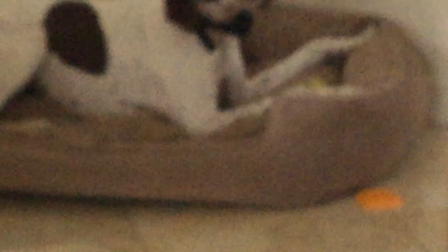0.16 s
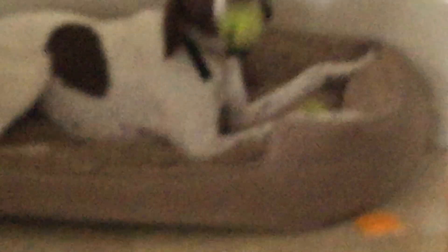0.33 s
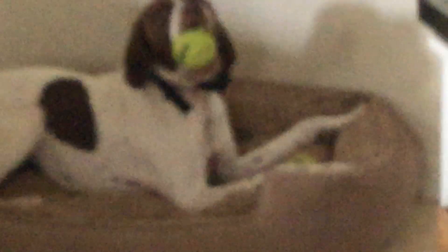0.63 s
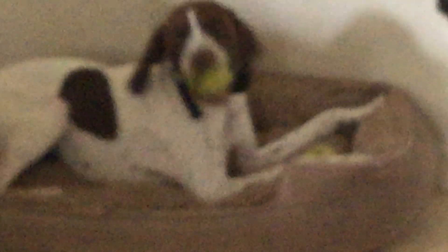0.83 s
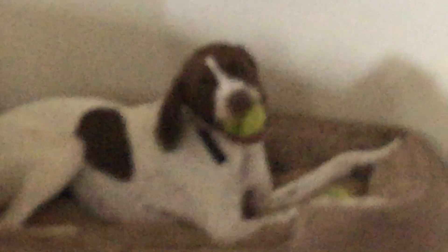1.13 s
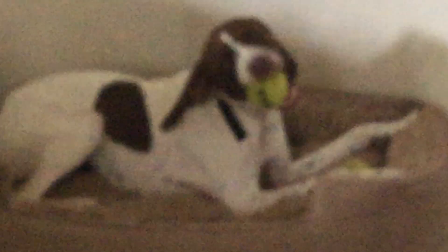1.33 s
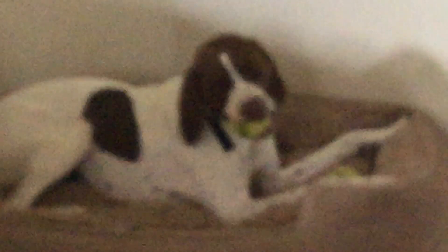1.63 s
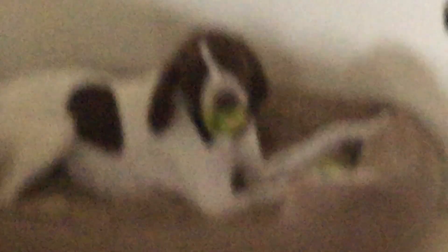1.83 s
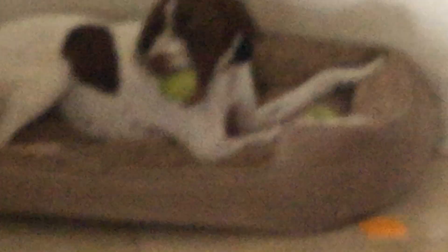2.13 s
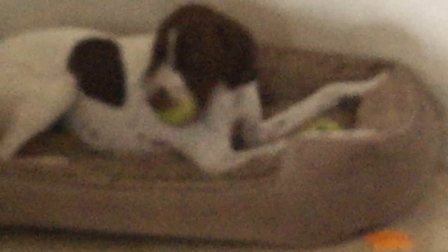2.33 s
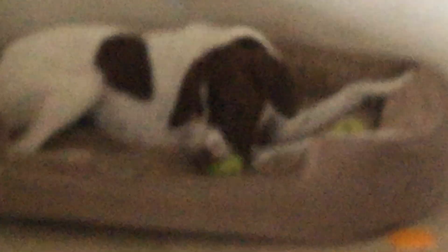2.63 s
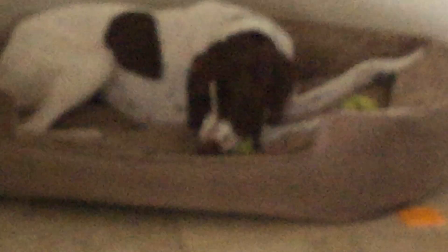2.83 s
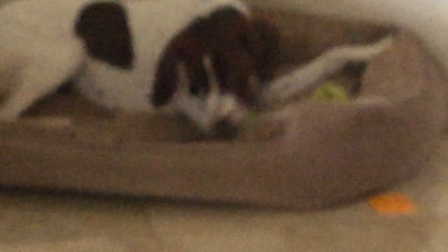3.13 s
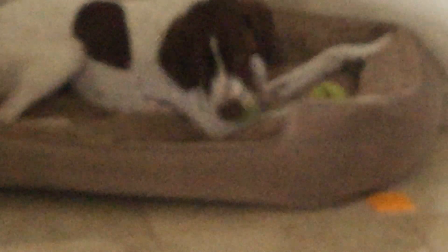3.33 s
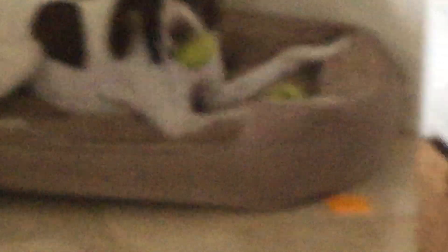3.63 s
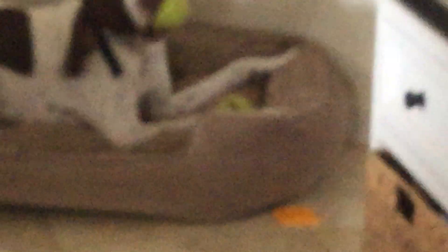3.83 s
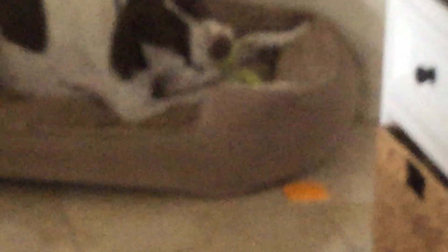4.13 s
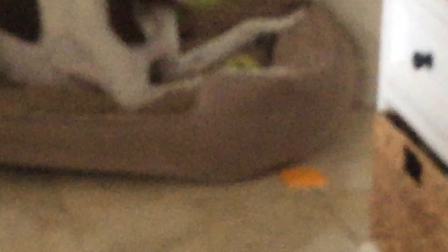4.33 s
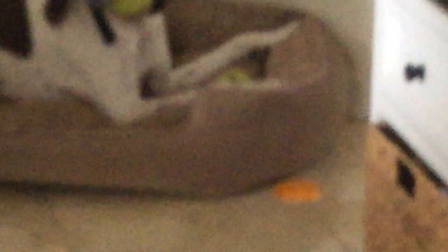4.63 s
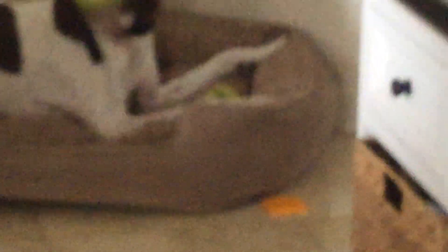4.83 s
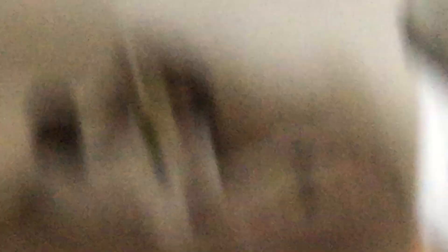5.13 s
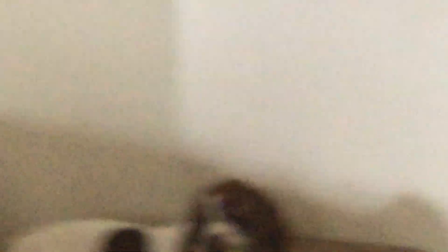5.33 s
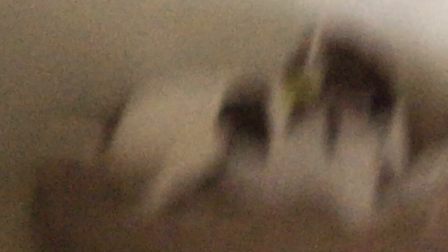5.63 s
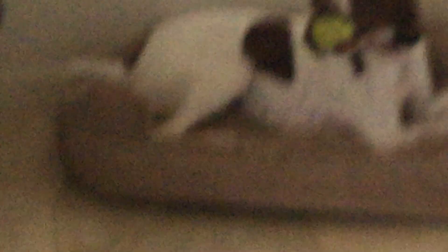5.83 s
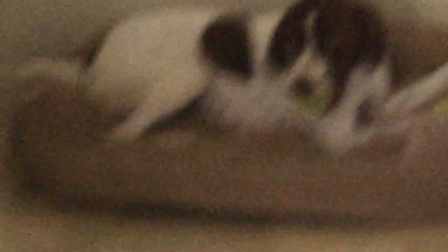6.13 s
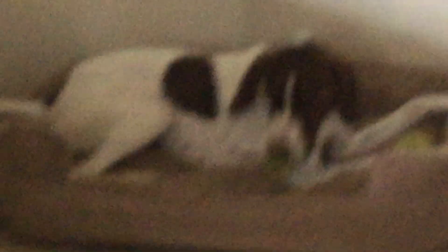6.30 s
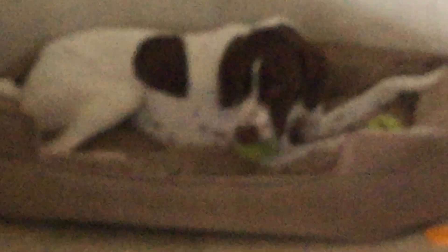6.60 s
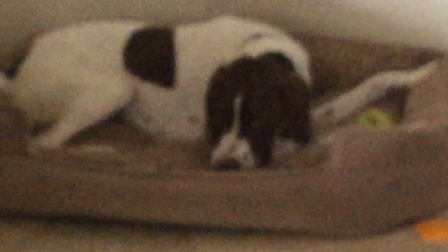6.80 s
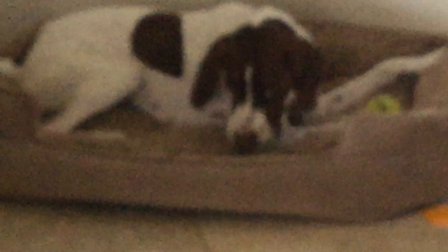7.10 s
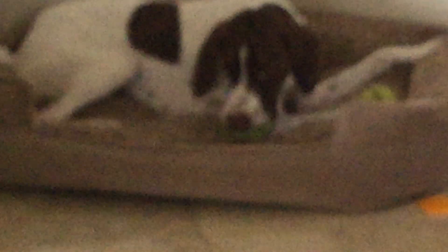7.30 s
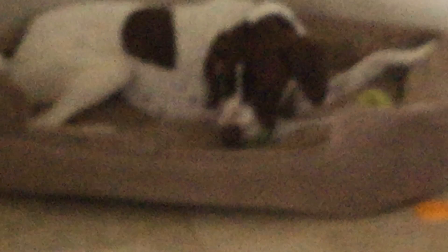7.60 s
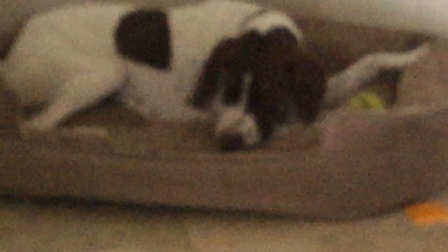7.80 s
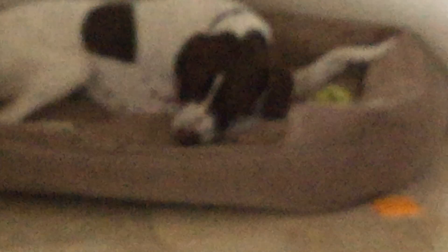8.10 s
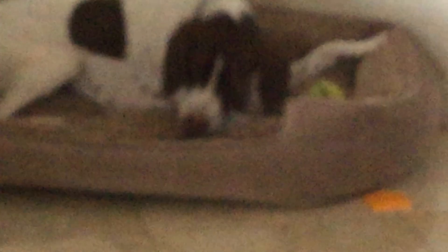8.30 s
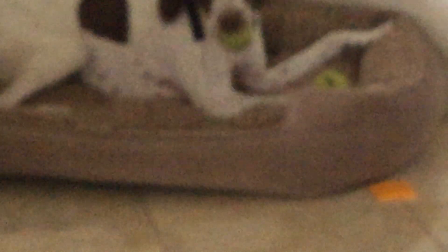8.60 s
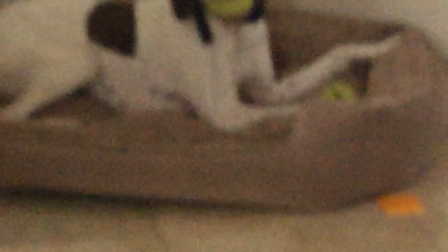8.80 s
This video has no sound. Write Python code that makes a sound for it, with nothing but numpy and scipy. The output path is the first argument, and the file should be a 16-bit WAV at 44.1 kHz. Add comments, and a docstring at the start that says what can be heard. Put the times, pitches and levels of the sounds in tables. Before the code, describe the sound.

A dog on a padded bed bites a squeaky ball a few metres away in a hard, echoing room. After quiet tooth scuffs, single and paired squeaks begin, sharp on each bite and softer, mostly sagging, as the ball refills. They grow more frequent in the second half, with dull cushion thuds. A faint, low, steady hush lies beneath, picked up by a phone-like microphone.

```python
"""A bare, echoing room: a dog lies in its padded bed and chews a squeaker ball a few metres away.
Each bite drives air through a reed whose pitch climbs with the pressure; as the jaw lets go,
the ball refills with a softer note, mostly sagging. Reed notes are harmonic stacks plus pulsed air noise.
Bumps of jaw and ball on the cushion and teeth scuffing the felt are shaped noise, over a steady hush."""
import sys
import numpy as np
from scipy import signal
from scipy.fft import rfft, irfft
from scipy.io import wavfile
from scipy.ndimage import uniform_filter1d

SR = 44100
rng = np.random.default_rng(int(sys.argv[2]) if len(sys.argv) > 2 else 0)


def generate_wav(signal):
    """Clip the signal to [-1, 1] and save it as 16-bit WAV at the path in sys.argv[1]."""
    frames = np.transpose(np.atleast_2d(signal))
    scaled = np.clip(frames, -1, 1) * 32767
    pcm = np.round(scaled).astype(np.int16)
    wavfile.write(sys.argv[1], SR, pcm)


N = 394694
LEAD = int(0.25 * SR)  # samples; the chewing is already under way at time zero
TOP_HZ = 15700


def undb(db):
    """Decibels to gain."""
    return 10 ** (np.asarray(db) / 20)


def unit(x):
    """Scale to rms 1."""
    return x / np.sqrt(np.mean(x ** 2))


def lookup(hz, points):
    """Interpolate (Hz, value) points on a log-frequency axis."""
    f, value = np.transpose(points)
    return np.interp(np.log(np.maximum(hz, 1)), np.log(f), value)


def colour(x, points, tilt_db=0):
    """Filter by (Hz, dB) points and a tilt in dB per octave; rms 1."""
    hz = np.fft.rfftfreq(len(x), 1 / SR)
    tilted = [(f, db + tilt_db * np.log2(f)) for f, db in points]
    return unit(irfft(rfft(x) * undb(lookup(hz, tilted)), len(x)))


def wander(n, rate_hz):
    """Normal random values, rate_hz of them a second, joined by lines."""
    at = np.arange(n) * rate_hz / SR
    return np.interp(at, np.arange(4096), rng.standard_normal(4096))


def add(track, start_s, x):
    """Mix x into the track from start_s on."""
    i = LEAD + int(start_s * SR)
    track[i:i + len(x)] += x[:len(track) - i]


def room_hush():
    """Steady background of the room: noise with a fixed spectrum."""
    # (frequency [Hz], relative density [dB per Hz])
    hush_spectrum = [(15, -60), (25, -30), (53, -5), (90, -9), (128, -4), (167, -7), (219, -2), (344, -5.5),
                     (529, -15.5), (1030, -21.5), (1350, -23.5), (1910, -25), (2370, -28), (9520, -38),
                     (15000, -57.5)]
    return colour(rng.standard_normal(N), hush_spectrum) * undb(-64)


def room(x, wet_db, early_db):
    """Direct sound, hard reflections from floor and walls, and a diffuse tail decaying band by band."""
    # reverberation time: (frequency [Hz], T60 [s])
    room_t60 = [(150, 0.22), (400, 0.27), (1300, 0.8), (2800, .68), (7000, 0.63), (10000, 0.49),
                (15000, 0.42)]
    build_s = 0.00077
    t = np.arange(SR) / SR
    hz = np.maximum(np.fft.rfftfreq(SR, 1 / SR), 1)
    noise = rfft(rng.standard_normal(SR))
    centres_hz = np.geomspace(100, 16000, 12)
    tail = 0
    # overlapping triangular bands
    for centre_hz, share in zip(centres_hz, np.eye(len(centres_hz))):
        weight = np.interp(np.log(hz), np.log(centres_hz), share)
        decay = np.exp(-np.log(1000) * t / lookup(centre_hz, room_t60))
        tail = tail + irfft(noise * weight, SR) * decay
    tail *= 1 - np.exp(-t / build_s)
    response = undb(wet_db) * unit(tail) / np.sqrt(SR)
    lags_s = rng.uniform(0.002, 0.022, 8)
    response[(lags_s * SR).astype(int)] += undb(early_db) * rng.choice([-1, 1], len(lags_s))
    response[0] += 1  # direct sound
    return signal.fftconvolve(x, response)[:len(x)]


def scuff(length_s, db):
    """Fibres slip past a tooth: a swell of felt-coloured noise of uneven level."""
    # felt spectrum: (frequency [Hz], relative level [dB])
    felt = [(1000, -36), (3000, -16.5), (3550, -4.5), (4500, -11.5), (8500, -8.5), (12000, -10.5),
            (15000, -35)]
    n = int(length_s * SR)
    ticks = rng.standard_normal(SR)[:n] * undb(5 * wander(n, 550))
    return colour(ticks, felt) * np.hanning(n) * undb(db)


def bump(db, bright_db):
    """A padded blow: a short, soft thud of noise."""
    # blow on the cushion: (frequency [Hz], relative level [dB])
    cushion = [(25, -42), (60, -25), (110, -14), (160, 8), (230, 3), (340, 13), (480, -11.5), (1000, -16),
               (1500, -50.5), (4000, -69)]
    rise_s, fall_s = 0.0021, 0.017
    t = np.arange(SR // 4) / SR
    thud = colour(rng.standard_normal(len(t)), cushion, bright_db)
    return thud * (1 - np.exp(-t / rise_s)) * np.exp(-t / fall_s) * undb(db)


def mouthed(spectrum, low_db):
    """The muzzle covers more or less of the ball and so changes its low end, below 2 kHz."""
    return [(f, db + low_db * (f < 2000)) for f, db in spectrum]


def squeak(hz, db, spectrum, tilt_db, octave_db, jitter, air_db, chiff_db, attack_s, release_s):
    """The reed chops air into a harmonic stack; it rasps while its pitch slides and when overblown."""
    t = np.arange(len(hz)) / SR

    # strain: 0 steady, 1 fully broken up
    full_slide_octaves_per_s = 40
    overblown_hz, strain_per_octave = 1900, 0.47
    slide = uniform_filter1d(np.abs(np.gradient(np.log2(hz))) * SR, 256)  # octaves/s
    overblown = strain_per_octave * np.maximum(np.log2(hz / overblown_hz), 0)
    strain = np.minimum(slide / full_slide_octaves_per_s + overblown, 1)

    flutter = jitter * (1 + 8 * strain) * wander(len(t), 900)
    phase = 2 * np.pi * np.cumsum(hz * (1 + flutter)) / SR

    # a harder blast shuts the reed more sharply: brighter per dB of level above -30 dB
    bright_db = tilt_db + 0.2725 * (db + 30)
    k = np.arange(1, 15)[:, None]  # harmonic number
    # lips and tongue shade each harmonic differently as the ball rolls in the mouth
    shade_db = 2.5 * np.array([wander(len(t), 24.9) for _ in k])
    partials_db = lookup(k * hz, spectrum) + bright_db * np.log2(k) + octave_db * (k == 2) + shade_db
    partials = undb(partials_db) * (k * hz < TOP_HZ)
    partials /= np.sqrt(np.sum(partials ** 2, axis=0) / 2)  # stack at rms 1
    tone = np.sum(partials * np.sin(k * phase), axis=0)

    # air hisses through the gap once a cycle, with a puff before the reed locks on
    rasp_db, chiff_s, air_tilt_db = 24, 0.0047, -1.9
    leak = undb(air_db + rasp_db * strain) + undb(chiff_db) * np.exp(-t / chiff_s)
    hiss = colour(rng.standard_normal(SR), spectrum, tilt_db + air_tilt_db)[:len(t)]
    air = hiss * (1 + np.cos(phase)) * leak

    gate = (1 - np.exp(-t / attack_s)) * np.clip((t[-1] - t) / release_s, 0, 1)
    shimmer_db = 3.5 * wander(len(t), 250)
    voice = (tone + air) * gate * undb(db + shimmer_db)
    # so small an opening radiates next to nothing below the lowest note
    return signal.sosfilt(signal.butter(8, 1000, "high", fs=SR, output="sos"), voice)


def refill(length_s, slackens_s, reed_hz, sag_hz_per_s, db, tilt_db, octave_db, low_db):
    """The ball springs back: the note settles, sags or rises, then steps down as suction gives out."""
    # radiation as air is drawn in: (frequency [Hz], relative level [dB])
    inflow = [(700, -33.5), (1000, -21), (1250, -5), (2600, 1.5), (3900, 0), (5200, -1), (6500, 0),
              (7600, -12), (9200, 2), (10500, 2.5), (12000, 1.5), (15500, -23.5)]
    slack_hz, slack_db, slack_s = 100.2, 7, 0.0069  # ball nearly full: lower, softer note
    overshoot_hz, soft_start_db, settle_s = 55.3, 1, 0.02  # first gulp: sharp and a little softer
    t = np.arange(int(length_s * SR)) / SR
    slack = (1 + np.tanh((t - slackens_s) / slack_s)) / 2
    gulp = np.exp(-t / settle_s)
    sag_hz = sag_hz_per_s * np.minimum(t, slackens_s)
    hz = reed_hz + overshoot_hz * gulp - sag_hz - slack_hz * slack
    level_db = db - soft_start_db * gulp - slack_db * slack
    return squeak(hz, level_db, mouthed(inflow, low_db), tilt_db, octave_db,
                  jitter=0.0028, air_db=-23.5, chiff_db=0.5, attack_s=0.0011, release_s=0.0061)


def bite(start_s, length_s, rest_hz, db, swell_s, tilt_db, low_db):
    """Air is forced out: pitch and level arch up with every clench of the jaw."""
    # pressure peaks: (tightest moment [s], pitch lift [Hz], tightening [s], easing [s])
    clenches = [(-.1, 2405, .035, 0.085), (1.659, 125, 0.031, .017), (2.489, 1021, 0.023, 0.04),
                (2.543, 2026, 0.039, 0.03), (3.539, 402, 0.016, 0.065), (3.59, 611.6, 0.021, .013),
                (4.592, 538, 0.0062, 0.017), (4.609, 363, 0.042, 0.046), (4.66, 279, 0.015, 0.0068),
                (5.019, 267.8, 0.029, 0.014), (5.41, 297.3, 0.041, 0.024), (5.418, 987, .019, 0.028),
                (5.793, 121.8, 0.014, .011), (6.564, 515, .009, 0.025), (7.13, 191, 0.015, .02),
                (7.259, 243, .039, 0.013), (8.015, 751.6, 0.022, 0.063), (8.077, 511.5, 0.02, 0.015),
                (8.87, 755, 0.019, 0.025), (8.917, 93, 0.024, 0.029)]
    # radiation as air leaves: (frequency [Hz], relative level [dB])
    outflow = [(700, -57), (1000, -33.5), (1250, -2.5), (1900, -4.5), (2600, -2), (4000, -4), (5000, -2),
               (6200, -1.5), (8500, 0), (11000, -5.5), (13000, -14.5), (15500, -37.5)]
    t = start_s + np.arange(int(length_s * SR)) / SR
    hz = np.full(len(t), float(rest_hz))
    for peak_s, lift_hz, tighten_s, ease_s in clenches:
        width_s = np.where(t < peak_s, tighten_s, ease_s)
        hz += lift_hz * np.exp(-np.square((t - peak_s) / width_s))
    # the pressure that lifts the pitch also lifts the level: 4.5 dB per octave
    level_db = db + 4.5 * np.log2(hz / rest_hz)
    return squeak(hz, level_db, mouthed(outflow, low_db), tilt_db, octave_db=0.0,
                  jitter=0.0022, air_db=-51.5, chiff_db=-7, attack_s=swell_s, release_s=0.036)


def scene():
    """Scuffs, bumps and squeaks sound from the dog bed into one room, over its hush."""
    # teeth on felt: (start [s], length [s], level [dB])
    scuffs = [(0.293, 0.096, -67), (0.44, 0.084, -74.5), (0.62, 0.087, -76.5), (0.73, .07, -65.5),
              (4.005, 0.087, -67.5), (6.222, 0.18, -68.5)]
    # jaw and ball on the cushion: (start [s], level [dB], brightness [dB/octave])
    bumps = [(0.777, -50.5, 12.5), (2.80, -50, -4.5), (3.873, -60, 12), (4.92, -57, -16), (6.563, -58, -1),
             (7.123, -53, -7), (7.545, -43.5, -3.5), (7.794, -41.5, -2), (8.379, -45.5, 0)]
    # air drawn in: (start [s], length [s], time until suction slackens [s], reed pitch [Hz],
    # sag [Hz/s] (negative rises), level [dB], brightness [dB/octave], second harmonic lift [dB],
    # low end [dB])
    refills = [(1.791, 0.076, .11, 1307, 343, -37.5, 1.6, -5.5, -5.5),
               (1.914, 0.15, 0.15, 1333, 577, -37, 0.68, 0, -3.5),
               (2.81, 0.037, 0.0238, 1342, 2480, -46.5, 0.33, 1.5, -3.5),
               (3.678, .19, .09, 1406, 1453.5, -40, 1.54, 10, -3.5),
               (5.518, 0.18, 0.13, 1361, 399, -38, 2.7, 1.5, 4.5),
               (5.87, .1, 0.068, 1313, 399, -35.5, 1.65, -0.5, 2),
               (6.789, 0.045, 0.035, 1313, 700, -39, 1.8, -1.5, 1.5),
               (7.337, .23, .13, 1317, 169, -37.5, 3.7, 0.5, 7),
               (7.794, .038, .028, 1306, 600, -38.5, 1.9, -0.5, 5),
               (8.143, 0.194, .107, 1302, 36.5, -39.5, 2.6, 0.5, 5.5),
               (8.345, 0.058, 0.059, 1182, -2600, -39, 6.1, 3.5, 16.5)]
    # air pushed out: (start [s], length [s], resting reed pitch [Hz], level at rest [dB],
    # swell time [s], brightness [dB/octave], low end [dB])
    bites = [(-.125, 0.12, 1414, -44.5, 0.06, 1, -3), (1.653, 0.042, 1276, -26.5, 0.0026, 2, 1),
             (2.445, 0.14, 1362, -35, 0.0038, -4, -10.5), (3.441, 0.21, 1363, -37.5, 0.014, -1, -5),
             (4.509, 0.18, 1393, -26.5, 0.0042, 3.5, 2), (4.972, 0.083, 1291, -25, .009, 3.5, 4.5),
             (5.33, 0.14, 1346, -27.5, .006, 2, 0.5), (5.77, 0.056, 1306, -27.5, 0.0013, 4, 5),
             (6.541, 0.094, 1355, -27.5, 0.009, 3.5, 1), (7.121, 0.17, 1406, -31.5, 0.0023, 4, 4),
             (7.957, 0.16, 1317, -30.5, 0.011, 3, 1.5), (8.828, 0.097, 1371, -24.5, 0.0073, 2.5, 2.5)]
    dog = np.zeros(LEAD + N)
    for start_s, length_s, db in scuffs:
        add(dog, start_s, scuff(length_s, db))
    for start_s, db, bright_db in bumps:
        add(dog, start_s, bump(db, bright_db))
    for start_s, *shape in refills:
        add(dog, start_s, refill(*shape))
    for start_s, *shape in bites:
        add(dog, start_s, bite(start_s, *shape))
    return (room(dog, wet_db=0.5, early_db=-10.0)[LEAD:] + room_hush())[None]


def record(dry):
    """The phone cuts the deep bass and the top treble."""
    thin = signal.sosfilt(signal.butter(6, 44, "high", fs=SR, output="sos"), dry)
    return signal.sosfilt(signal.ellip(10, 0.2, 70, TOP_HZ, fs=SR, output="sos"), thin)


dry = scene()
out = record(dry)
generate_wav(out)
```